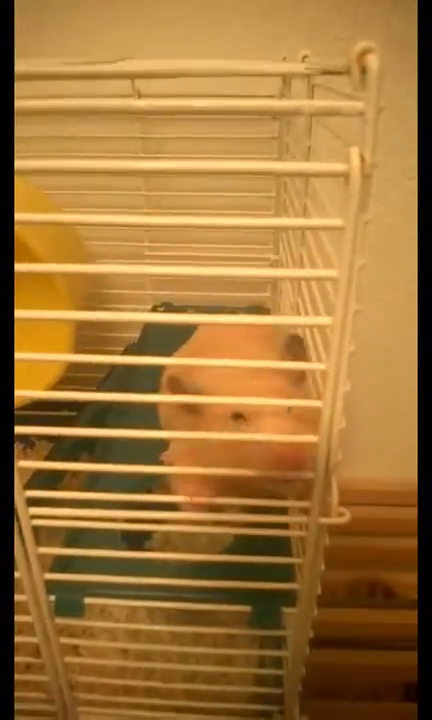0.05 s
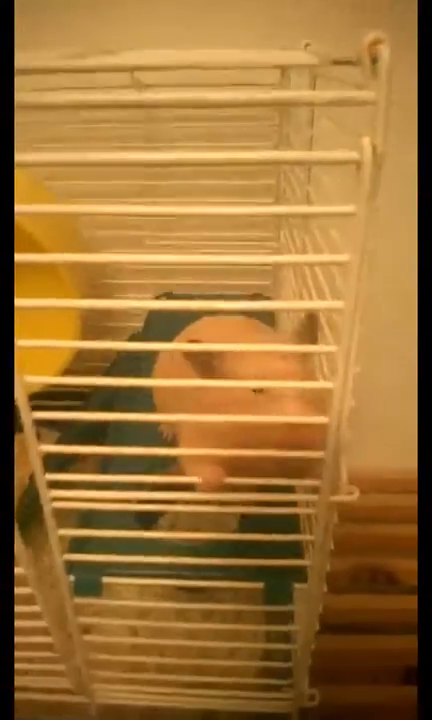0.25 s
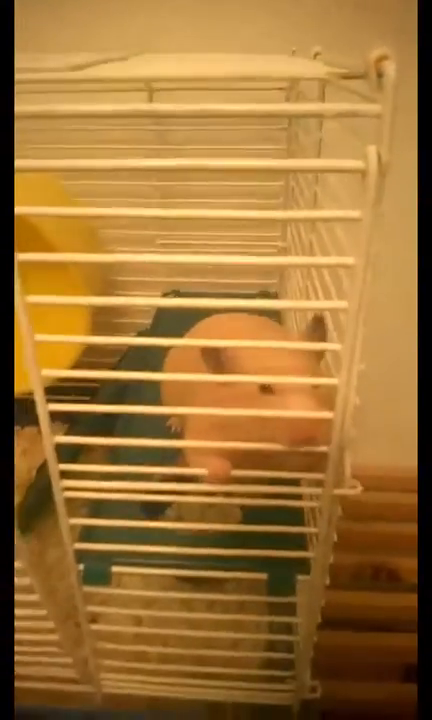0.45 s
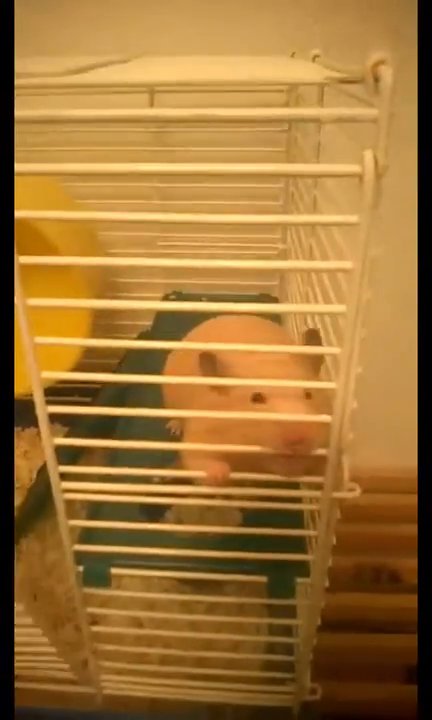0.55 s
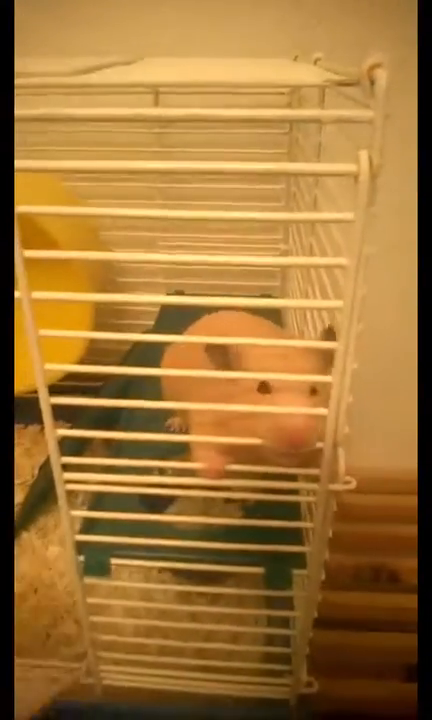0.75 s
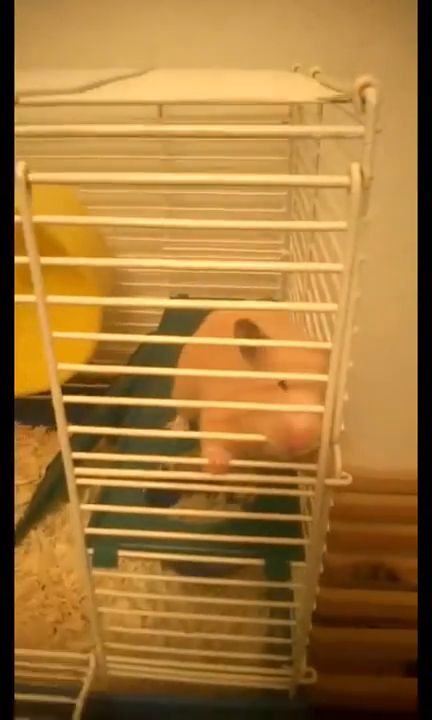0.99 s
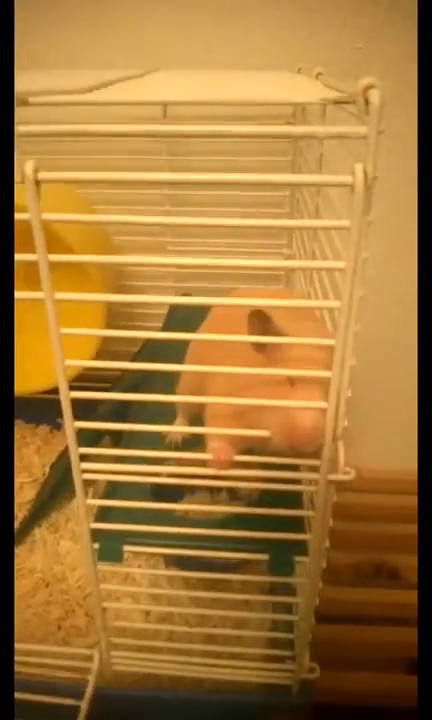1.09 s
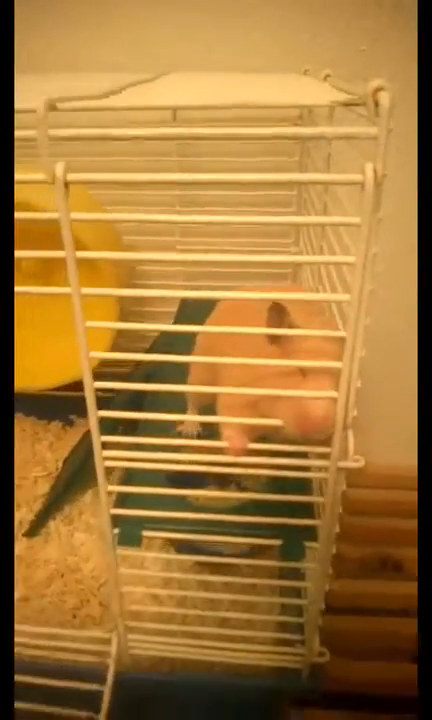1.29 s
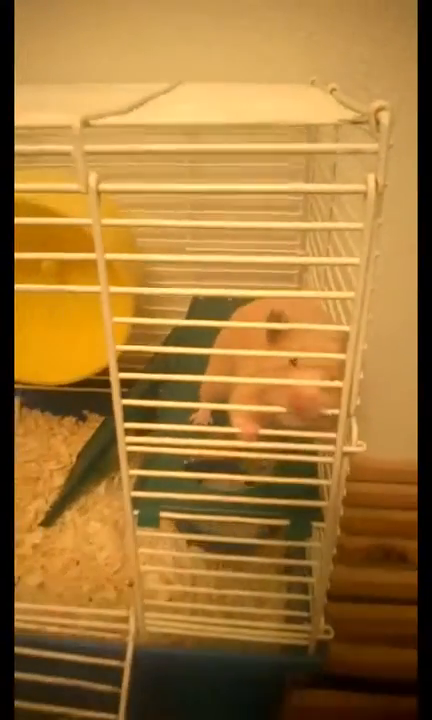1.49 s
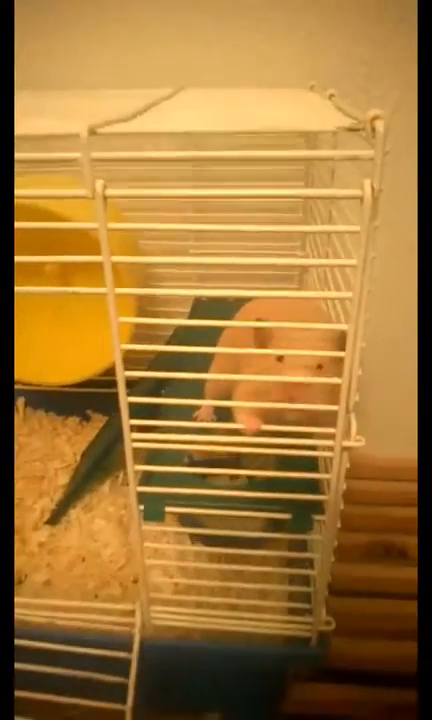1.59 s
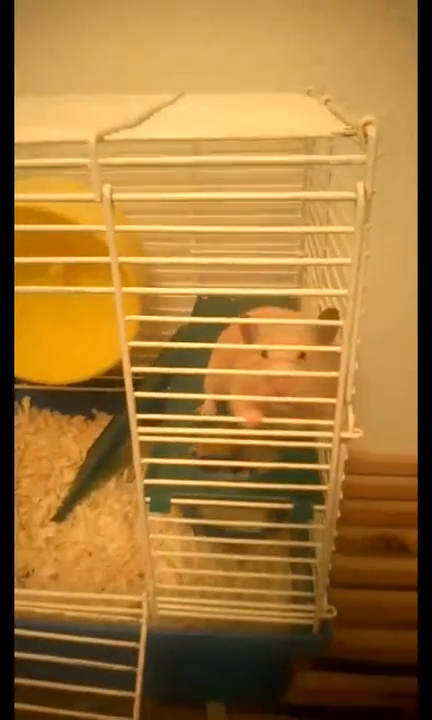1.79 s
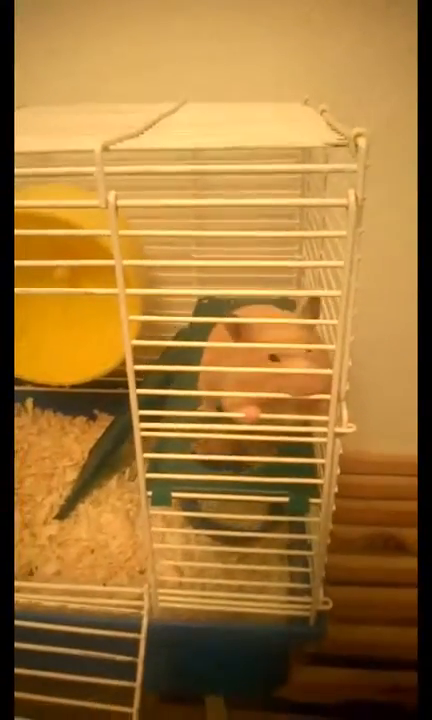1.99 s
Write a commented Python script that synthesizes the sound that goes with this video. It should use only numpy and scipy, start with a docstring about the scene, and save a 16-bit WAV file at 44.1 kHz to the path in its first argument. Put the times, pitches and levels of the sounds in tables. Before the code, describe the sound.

A wire cage door opens close to the microphone. After a few light knocks, it springs off its catch at about 0.2 seconds with bright snaps, a loud rattle and a low thump from the plastic base. The bars ring and fade by 0.8 seconds. Soft rubs and ticks come around 1.1 seconds, then faint bumps and a slight hinge tone near 1.7, over quiet room rumble.

```python
"""A hamster cage's wire door springs off its catch, close to the microphone in a small room.
Wire snaps past wire, knocks rattle the cage, the plastic base thumps and the bars ring on.
The door swings down with soft rubs, bumps, tiny ticks and a faint hinge tone.
Faint handling hiss and a quiet room rumble lie beneath; the recorder turns quiet treble down."""
import sys
import numpy as np
from scipy import signal
from scipy.fft import rfft, irfft
from scipy.io import wavfile
from scipy.ndimage import uniform_filter1d

SR = 44100
rng = np.random.default_rng(int(sys.argv[2]) if len(sys.argv) > 2 else 0)


def generate_wav(sig):
    """Save sig (samples, or channels by samples) to the path in sys.argv[1] as 16-bit PCM at SR."""
    pcm = np.round(np.clip(np.atleast_2d(sig).T, -1, 1) * 32767).astype(np.int16)
    wavfile.write(sys.argv[1], SR, pcm)


N = 90404
TIME_S = np.arange(N) / SR
AGE_S = TIME_S[:65536]  # time since a contact

# room rumble: freq_hz, level_db
ROOM_SPECTRUM = [(20, -6), (50, -2), (90, 2), (150, -8), (300, -14.5), (700, -19.5), (1300, -26.5),
                 (1700, -27.5), (2500, -22.5), (5000, -24), (9000, -31), (16000, -32)]
# knocks on the cage: start_s, level_db, lowpass_hz, highpass_hz, bars_db
CAGE_KNOCKS = [(.0, -47.5, 1760, 400, -6), (0.049, -36.5, 450, 150, -11.5), (.062, -25.5, 430, 199.2, -9),
               (.067, -33, 850, 220, -6), (.078, -30.5, 1100, 150.5, -1), (.187, -28, 800, 69.5, -6.5),
               (.193, -22, 1299, 403, -7.5), (.2135, -8.5, 1620, 180, -9.5), (.229, -14.5, 2300, 204, -8.5),
               (.235, -7, 2000, 98, -4), (.257, -13, 1590, 80.8, -7.5), (.28, -26, 1200, 90.1, -8.5),
               (.329, -18.5, 1300, 120, -12), (.693, -42.5, 750, 250, -7.5), (.868, -55.5, 810, 592, 23),
               (1.172, -39, 1810, 219, -11), (1.219, -36, 900, 400, -13), (1.588, -43, 395.7, 170, -2),
               (1.602, -44.5, 906, 400, -13), (1.649, -40.5, 850, 350.3, -5.5),
               (1.831, -44.5, 287, 171, -9)]
# dense cage modes: freq_hz, level_db
CAGE_SPECTRUM = [(40, -2.5), (160, 1.5), (300, 2.5), (420, -5.5), (520, -3.5), (640, -5.5), (780, 2.5),
                 (950, -5), (1300, -7.5), (1800, -10), (2400, -12.5), (5000, -23)]
# their decay after a knock: freq_hz, t60_s
CAGE_DECAY = [(60, 0.42), (250, 0.4), (700, .38), (1300, .29), (2500, 0.31), (5000, 0.24)]
# cage frame: pitch_hz, level_db, t60_s
FRAME_MODES = [(228, -13, .26), (269, -4, .36), (304, -6, .36), (321, -4, .35), (518, -1, .28),
               (614, -7, .28), (670, -8, .3), (741, -4, .38), (802, -7, .35), (980, -7, .28),
               (1146, -14, .26), (1330, -8, .22), (1367, -13, .24), (1545, -15, .16), (1768, -10, .2)]
# cage bars: pitch_hz, level_db, t60_s
BAR_MODES = [(366.5, -11.5, 1.35), (386, -13, 1.3), (437.7, -11, 1.25), (519, -10.5, 1.1), (536, -16.5, .8),
             (701, -15, 1.3), (738, -5.5, 0.92), (778, 0, 1.04), (815, -8.5, 1.15), (827, -10.5, 0.72),
             (843, -7, 0.65), (861, -4.5, 1.2), (977, -14.5, .85), (1037, -15.5, .9), (1120, -16.5, 0.68),
             (1091, -15, 1.1), (1240, -23.5, 1.1)]
# handling hiss: peak_s, half_length_s, level_db
HISS_SWELLS = [(0.038, 0.072, -59.5), (0.204, 0.063, -57.5), (1.195, 0.041, -65.5), (1.703, 0.2, -68.5)]
# its spectrum: freq_hz, level_db
HISS_SPECTRUM = [(1000, -2.5), (5000, 0), (8000, -5), (16000, -11)]
# base rocking: start_s, level_db
BASE_THUMPS = [(0.067, -51), (0.136, -45.5), (.22, -30.5), (0.242, -25.5), (.257, -14.5), (0.292, -22.5),
               (1.648, -61.5), (1.747, -55)]
# plastic base: pitch_hz, level_db, t60_s
BASE_MODES = [(27, -7.5, 0.48), (48, -0.5, 0.45), (76.2, -1, .33), (122, -6.5, .25), (154, -1.5, .3),
              (207.7, -6, 0.1)]
# wire snapping past wire: start_s, level_db, lowpass_hz, highpass_hz
CATCH_SNAPS = [(0.185, -41, 15400, 900), (.206, -22.5, 16200, 7900), (0.2092, -16, 13600, 4300),
               (0.2249, -18.5, 16000, 1440), (0.2306, -16, 15200, 870), (.238, -18.5, 16000, 1180),
               (0.255, -24, 8000, 900), (.279, -25.5, 7000, 906), (.326, -27, 9000, 1475),
               (0.347, -38, 8000, 1470)]
# dense modes of a snap: freq_hz, level_db
SNAP_SPECTRUM = [(900, -14), (1700, 3.5), (2300, -2), (2700, 3), (4000, -2), (7000, -5), (9500, -4.5),
                 (11500, -4.5), (13200, 0), (14500, -11), (16000, -4)]
# their decay: freq_hz, t60_s
SNAP_DECAY = [(1000, 0.15), (3000, 0.26), (6000, 0.24), (10000, .21), (16000, .21)]
# catch: pitch_hz, level_db, t60_s
CATCH_MODES = [(1768, -8, .19), (1985, -13, .2), (2690, -12, .18), (5090, -16, .22), (7174, -11, .18),
               (13080, -13, .18), (13240, -13, .17), (14050, -15, .18)]
# door rubbing: peak_s, rise_s, fall_s, level_db, lowpass_hz, highpass_hz, bars_db
DOOR_RUBS = [(.43, 0.056, .14, -43, 999, 500, 8.5), (.99, 0.062, 0.053, -62, 846, 400, 8.5),
             (1.092, .007, 0.031, -42, 4000, 1497, -14), (1.112, 0.0096, 0.029, -46, 2800, 1300, -19),
             (1.105, 0.012, .06, -45, 702, 221, 3.5), (1.192, 0.029, 0.019, -43.5, 1480, 270, -9.5),
             (1.223, 0.011, 0.0093, -41, 1060, 448, -3), (1.49, .05, 0.1, -65, 896, 201.5, 6.5),
             (1.69, 0.024, 0.044, -48, 880, 165.4, -12), (1.77, .025, 0.06, -52.5, 705, 200, -7.5)]
# wire ticks: start_s, level_db, pitch_hz
WIRE_TICKS = [(.796, -60.5, 6540), (1.172, -55, 6020), (1.781, -51, 9200)]
BAND_EDGES_HZ = [20, 160, 500, 1000, 2000, 4000, 8000, 20000]


def undb(db):
    """Decibels to gain."""
    return 10 ** (np.asarray(db) / 20)


def unit_rms(x):
    """Scale to rms 1."""
    return x / np.sqrt(np.mean(x ** 2) + 1e-20)


def lookup(points, hz):
    """Interpolate (freq_hz, value) points over log frequency."""
    freqs_hz, values = np.array(points, float).T
    return np.interp(np.log(hz), np.log(freqs_hz), values)


def add(out, x, start_s):
    """Mix x in at start_s."""
    i = int(start_s * SR)
    out[i:i + len(x)] += x[:N - i]


def decay(age_s, t60_s):
    """Exponential fade, 60 dB per t60_s."""
    return np.exp(-np.log(1000) * age_s / t60_s)


def swell(peak_s, rise_s, fall_s):
    """Gaussian rise and fall."""
    width_s = np.where(TIME_S < peak_s, rise_s, fall_s)
    return np.exp(-((TIME_S - peak_s) / width_s) ** 2)


def noise(spectrum):
    """Steady coloured noise, rms 1."""
    hz = np.fft.rfftfreq(N, 1 / SR) + 1e-3
    return unit_rms(irfft(rfft(rng.standard_normal(N)) * undb(lookup(spectrum, hz)), N))


def contact(x, lowpass_hz, highpass_hz):
    """A soft contact loses treble, a light one bass."""
    dulled = signal.sosfilt(signal.butter(3, lowpass_hz, fs=SR, output="sos"), x)
    return signal.sosfilt(signal.butter(2, highpass_hz, "high", fs=SR, output="sos"), dulled)


def clatter(spectrum, decay_points):
    """Dense cage and room modes: noise bands start together, fade at their own rates."""
    out = np.zeros(len(AGE_S))
    age_s = AGE_S[:len(AGE_S) // 2]
    hz = np.fft.rfftfreq(len(age_s), 1 / SR) + 1e-3
    bins = undb(lookup(spectrum, hz)) * np.exp(2j * np.pi * rng.random(len(hz)))
    bins /= np.std(irfft(bins))
    for low_hz, high_hz in zip(BAND_EDGES_HZ, BAND_EDGES_HZ[1:]):
        band = irfft(bins * (hz >= low_hz) * (hz < high_hz))
        t60_s = lookup(decay_points, np.sqrt(low_hz * high_hz))
        add(out, band * decay(age_s, t60_s), 0)
    return out


def ring(modes, rise_s, phases_rad):
    """Decaying partials build up as the blow spreads."""
    partials = sum(undb(db) * decay(AGE_S, t60_s) * np.sin(2 * np.pi * hz * AGE_S + phase)
                   for (hz, db, t60_s), phase in zip(modes, phases_rad))
    return partials * (1 - np.exp(-AGE_S / rise_s))


def struck(modes, rise_s=0.006):
    """Each blow lands on another spot: random mode phases."""
    return ring(modes, rise_s, 2 * np.pi * rng.random(len(modes)))


def room_rumble(level_db=-62.5):
    """Steady, bass-heavy room noise."""
    return undb(level_db) * noise(ROOM_SPECTRUM)


def cage_knocks(dense_db=-7, frame_db=-12.5):
    """Each knock rattles the cage and leaves the bars ringing."""
    out = np.zeros(N)
    for start_s, level_db, lowpass_hz, highpass_hz, bars_db in CAGE_KNOCKS:
        dense = undb(dense_db) * clatter(CAGE_SPECTRUM, CAGE_DECAY)
        frame = undb(frame_db) * struck(FRAME_MODES)
        blow = dense + frame + undb(bars_db) * bar_ring()
        add(out, undb(level_db) * contact(blow, lowpass_hz, highpass_hz), start_s)
    return out


def bar_ring(level_db=-19, rise_s=0.008, detune_hz=12, twin_db=-4):
    """Bars beat against slightly detuned neighbours."""
    twins = [(hz + detune_hz * rng.standard_normal(), db + twin_db, t60_s)
             for hz, db, t60_s in BAR_MODES]
    return undb(level_db) * sum(joint_chatter() * struck(modes, rise_s) for modes in (BAR_MODES, twins))


def joint_chatter(cutoff_hz=28, depth=0.4):
    """Loose joints make the ring level waver."""
    lowpass = signal.butter(2, cutoff_hz, fs=SR, output="sos")
    waver = signal.sosfilt(lowpass, rng.standard_normal(len(AGE_S)))
    return 1 + depth * unit_rms(waver)


def handling_hiss():
    """Handling: faint swells of noise."""
    envelope = sum(undb(db) * swell(peak_s, half_s, half_s) for peak_s, half_s, db in HISS_SWELLS)
    return envelope * noise(HISS_SPECTRUM)


def base_thumps():
    """The plastic base booms as the cage rocks."""
    out = np.zeros(N)
    boom = ring(BASE_MODES, rise_s=0.0052, phases_rad=np.zeros(len(BASE_MODES)))
    for start_s, level_db in BASE_THUMPS:
        add(out, undb(level_db) * boom, start_s)
    return out


def catch_snaps(dense_db=-10.5, ring_db=-10.5, crack_s=0.002):
    """The door slips off its catch: bright clashes, each opening with a crack."""
    out = np.zeros(N)
    crack = 1 + np.exp(-AGE_S / crack_s)
    for start_s, level_db, lowpass_hz, highpass_hz in CATCH_SNAPS:
        dense = undb(dense_db) * clatter(SNAP_SPECTRUM, SNAP_DECAY)
        clash = crack * dense + undb(ring_db) * struck(CATCH_MODES)
        add(out, undb(level_db) * contact(clash, lowpass_hz, highpass_hz), start_s)
    return out


def door_rubs(slips_per_s=450, spread_db=2, slip_t60_s=0.11):
    """Uneven slips of the swinging door shake cage and bars."""
    out = np.zeros(N)
    for peak_s, rise_s, fall_s, level_db, lowpass_hz, highpass_hz, bars_db in DOOR_RUBS:
        slips = (rng.random(N) < slips_per_s / SR) * rng.choice([-1, 1], N)
        strength = undb(spread_db * rng.standard_normal(N))
        force = unit_rms(slips * strength) * swell(peak_s, rise_s, fall_s)
        body = clatter(CAGE_SPECTRUM, [(500, slip_t60_s)])  # same decay in all bands
        response = (body + undb(bars_db) * bar_ring()) / np.linalg.norm(body)
        shaken = signal.fftconvolve(force, response)[:N]
        out += undb(level_db) * contact(shaken, lowpass_hz, highpass_hz)
    return out


def wire_ticks(t60_s=0.015, skirt_db=-22):
    """Tiny wire ticks: short bursts of band noise."""
    out = np.zeros(N)
    for start_s, level_db, pitch_hz in WIRE_TICKS:
        band = noise([(pitch_hz / 2, skirt_db), (pitch_hz, 0), (pitch_hz * 2, skirt_db)])
        add(out, undb(level_db) * band * decay(TIME_S, t60_s), start_s)
    return out


def hinge_tone(pitch_hz=571, level_db=-53):
    """The hinge sings one soft, pure tone."""
    envelope = swell(peak_s=1.74, rise_s=0.037, fall_s=0.09)
    return undb(level_db) * envelope * np.sin(2 * np.pi * pitch_hz * TIME_S)


def scene():
    """Cage and room, mono."""
    cage = catch_snaps() + cage_knocks() + door_rubs() + base_thumps() + wire_ticks() + hinge_tone()
    return (cage + handling_hiss() + room_rumble())[None]


def record(dry):
    """The recorder ducks quiet treble, rounds peaks and cuts the top."""
    split_hz, threshold_db, duck_depth, top_hz = 1836, -52, 0.62, 15800
    low = signal.sosfiltfilt(signal.butter(5, split_hz, fs=SR, output="sos"), dry)
    treble = dry - low
    treble_power = np.abs(uniform_filter1d(treble ** 2, size=600))
    treble_gain = 1 - duck_depth / (1 + (treble_power / undb(threshold_db) ** 2) ** 2)
    rounded = np.tanh(1.239 * (low + treble_gain * treble)) / 1.184
    return signal.sosfilt(signal.ellip(10, 0.2, 80, top_hz, fs=SR, output="sos"), rounded)


dry = scene()
out = record(dry)
generate_wav(out)
```